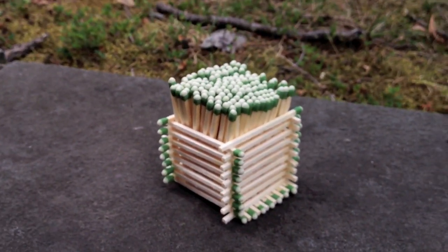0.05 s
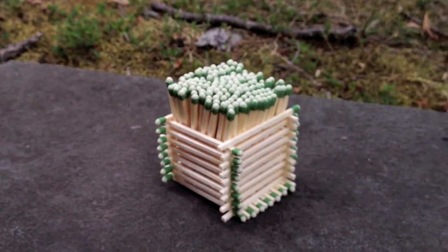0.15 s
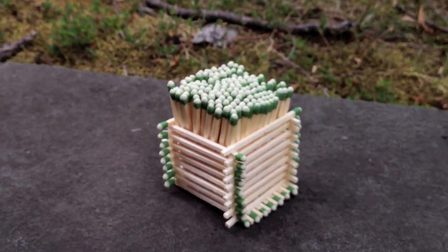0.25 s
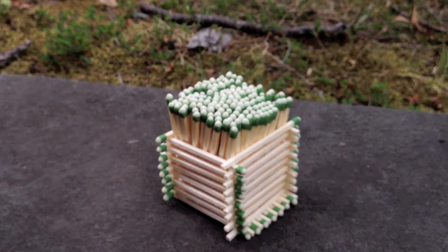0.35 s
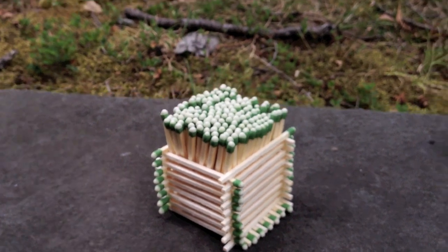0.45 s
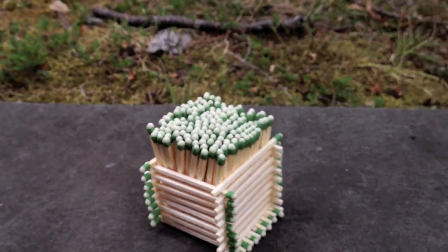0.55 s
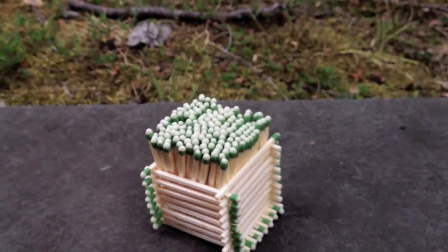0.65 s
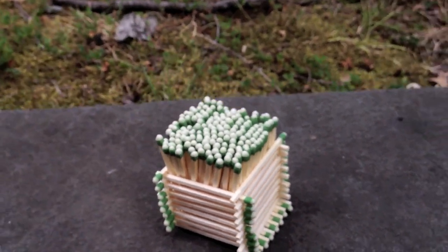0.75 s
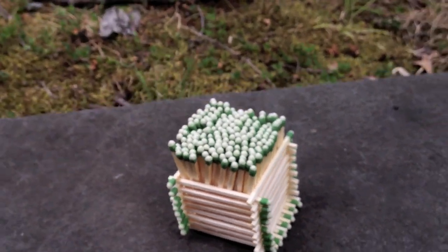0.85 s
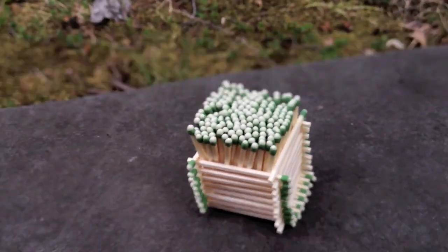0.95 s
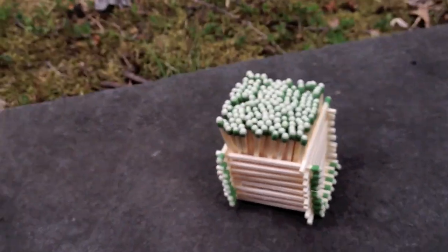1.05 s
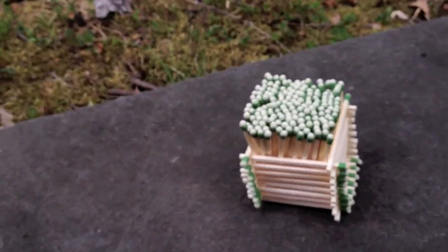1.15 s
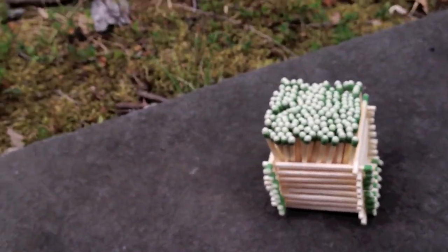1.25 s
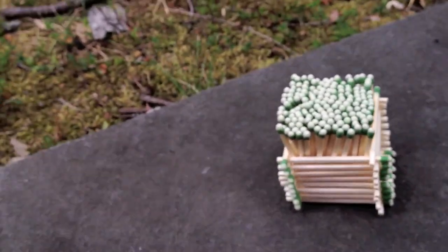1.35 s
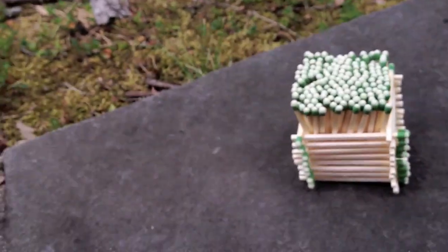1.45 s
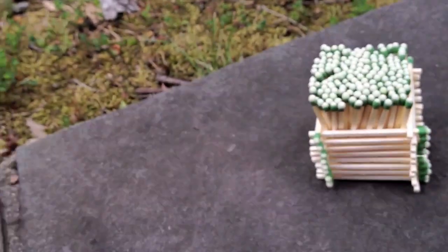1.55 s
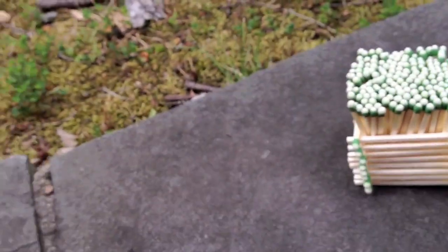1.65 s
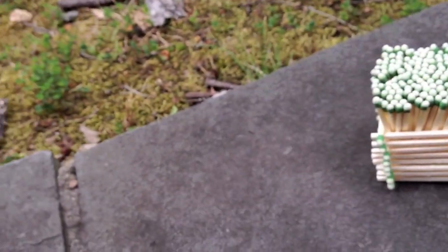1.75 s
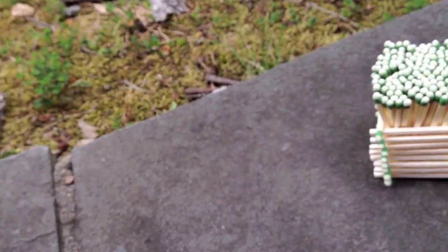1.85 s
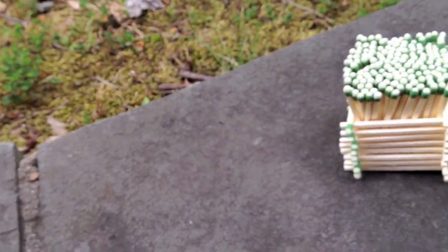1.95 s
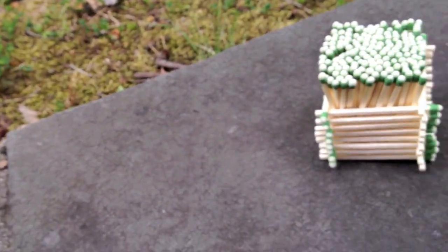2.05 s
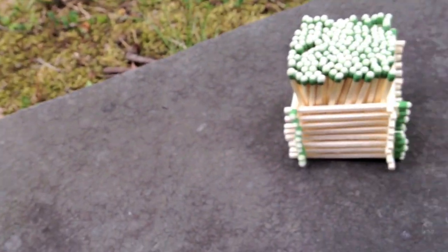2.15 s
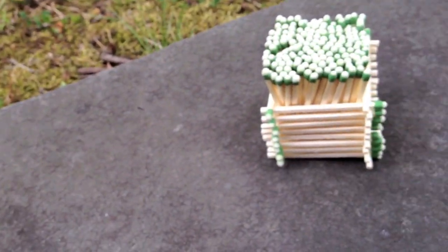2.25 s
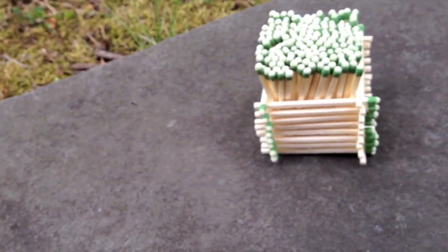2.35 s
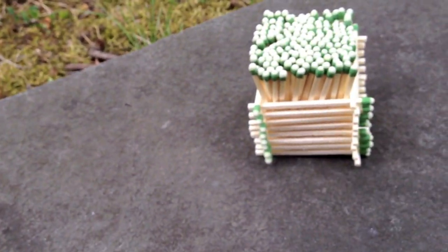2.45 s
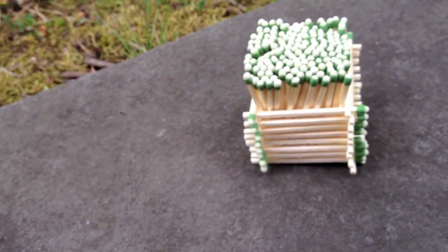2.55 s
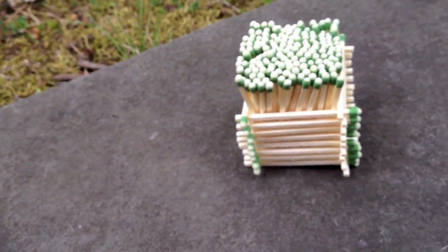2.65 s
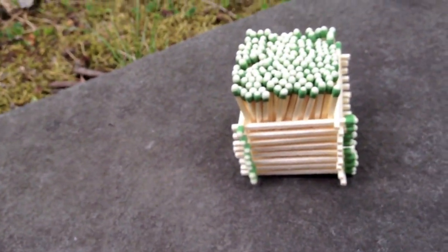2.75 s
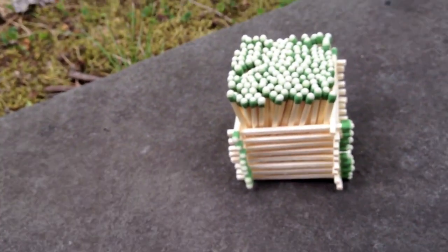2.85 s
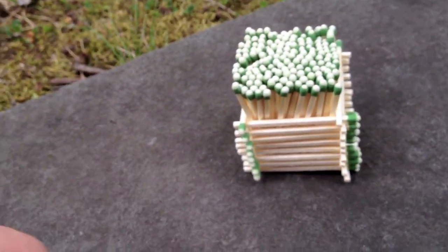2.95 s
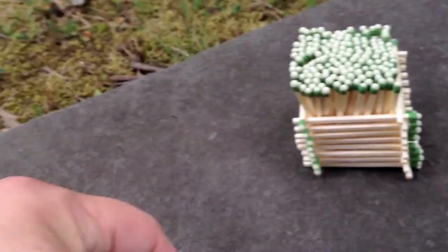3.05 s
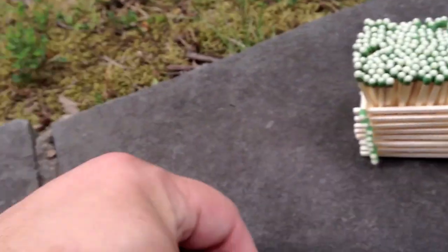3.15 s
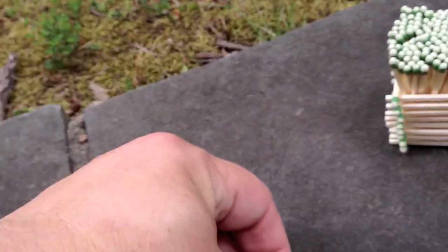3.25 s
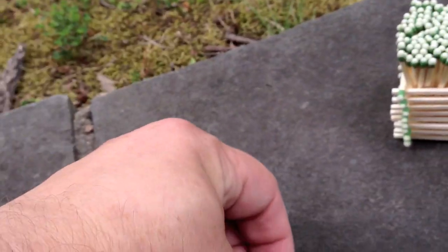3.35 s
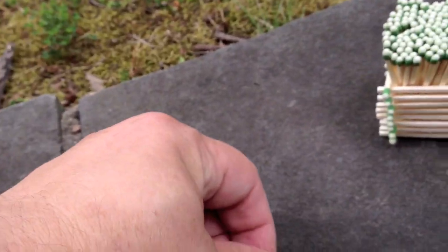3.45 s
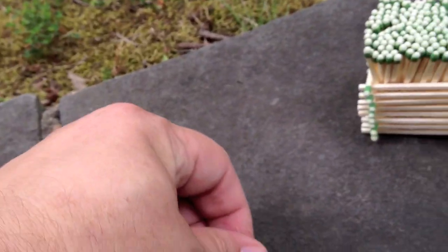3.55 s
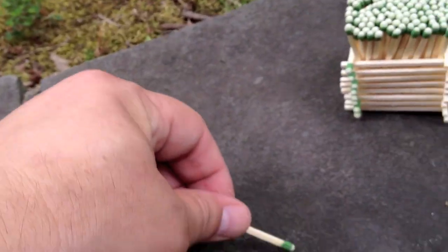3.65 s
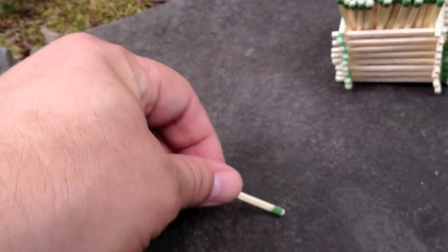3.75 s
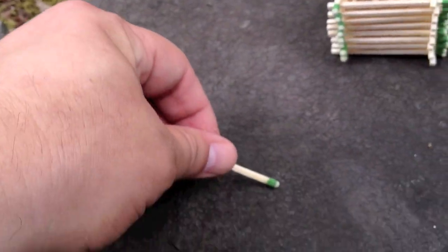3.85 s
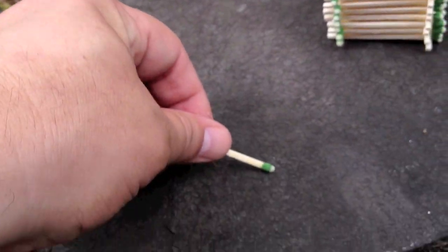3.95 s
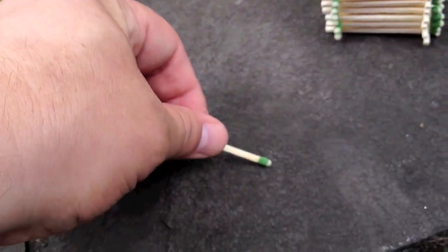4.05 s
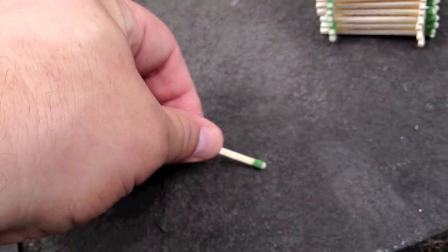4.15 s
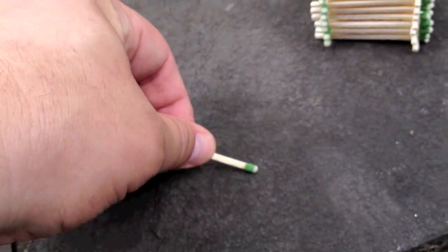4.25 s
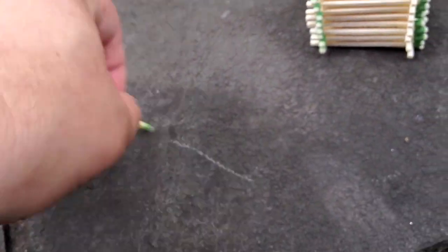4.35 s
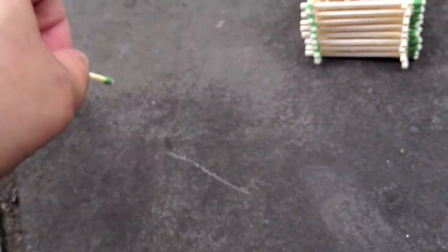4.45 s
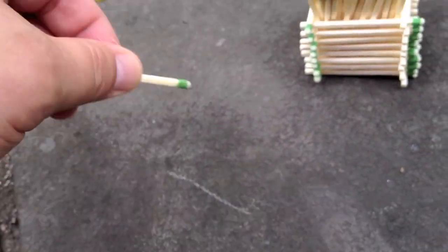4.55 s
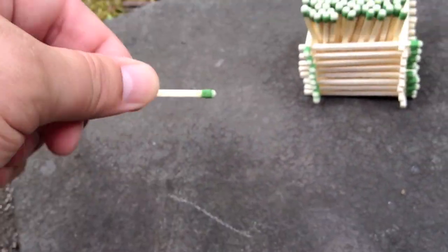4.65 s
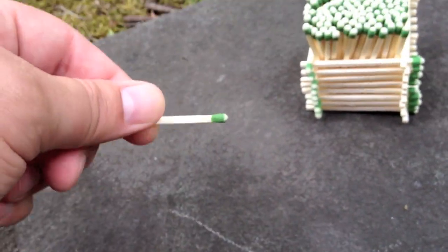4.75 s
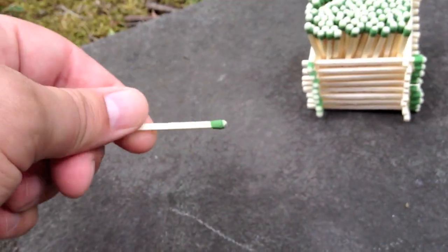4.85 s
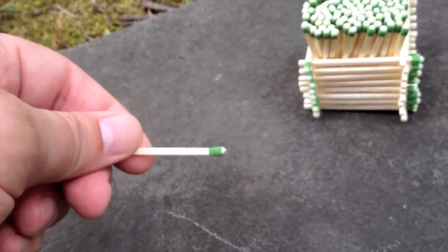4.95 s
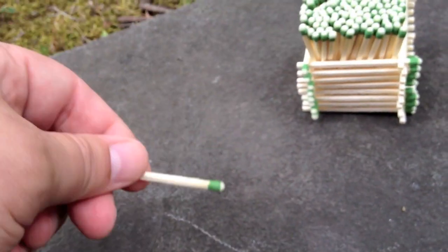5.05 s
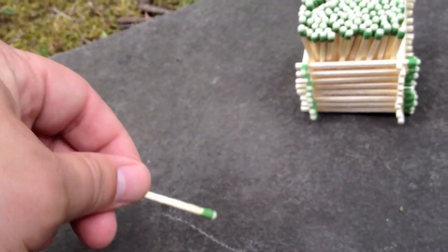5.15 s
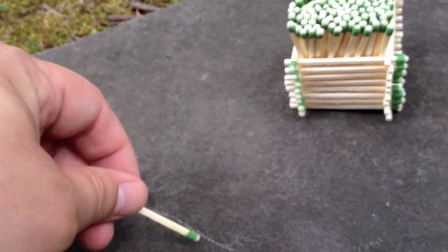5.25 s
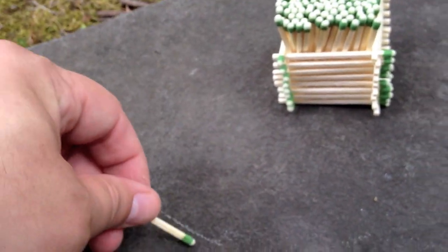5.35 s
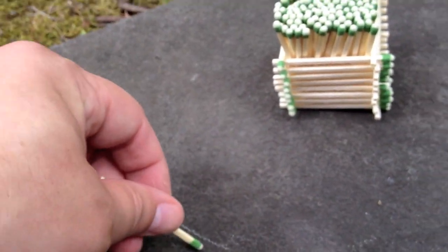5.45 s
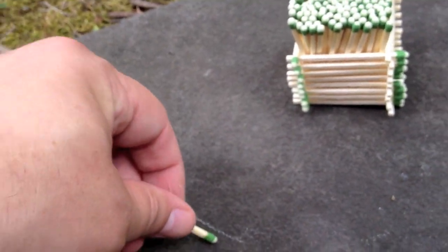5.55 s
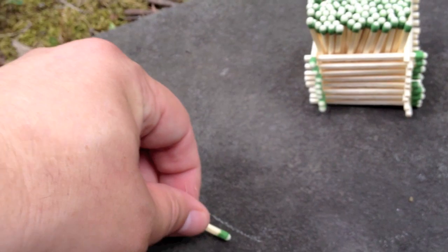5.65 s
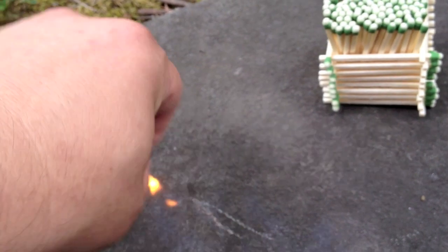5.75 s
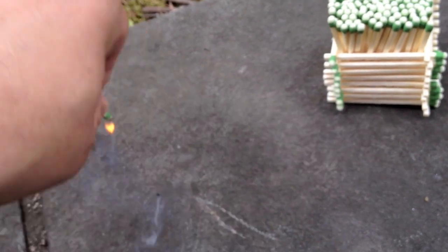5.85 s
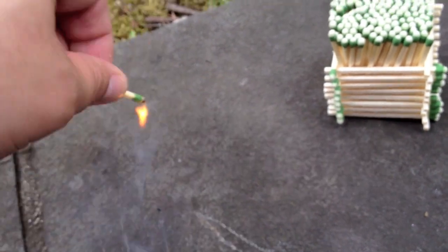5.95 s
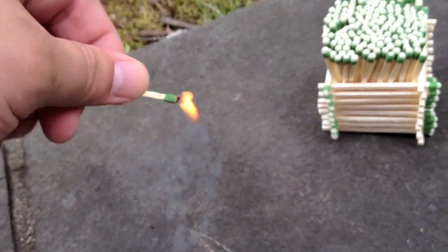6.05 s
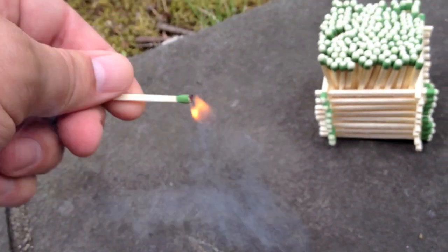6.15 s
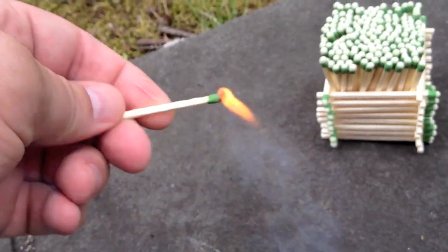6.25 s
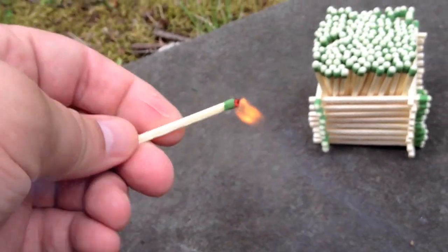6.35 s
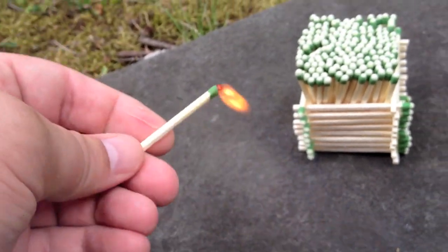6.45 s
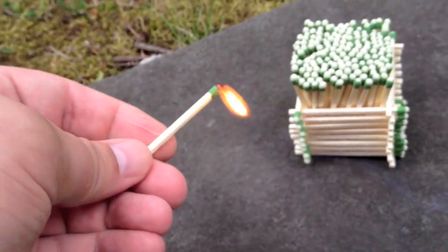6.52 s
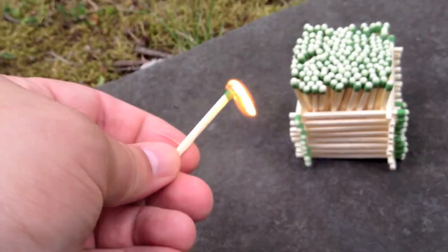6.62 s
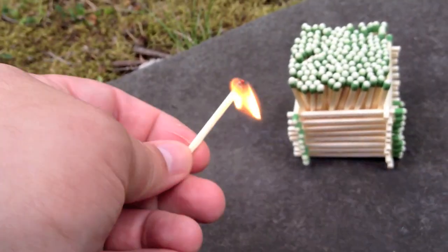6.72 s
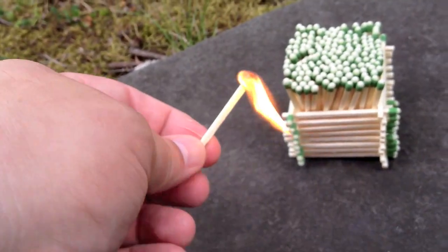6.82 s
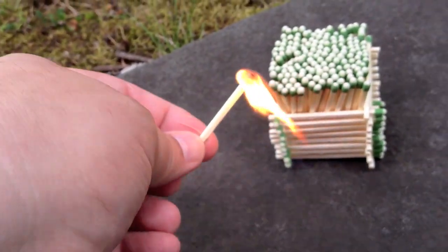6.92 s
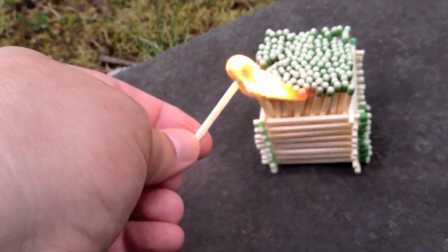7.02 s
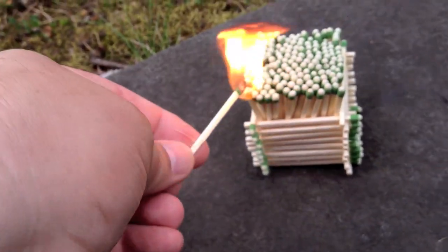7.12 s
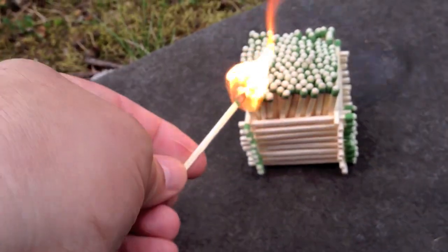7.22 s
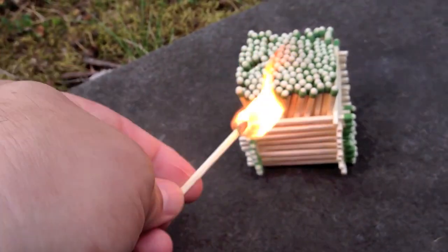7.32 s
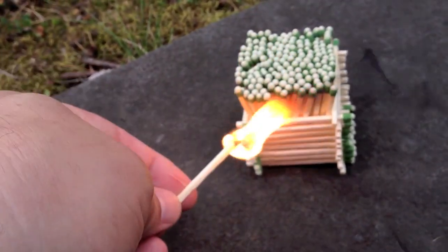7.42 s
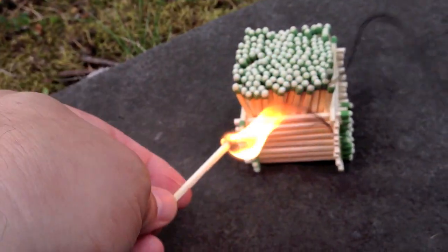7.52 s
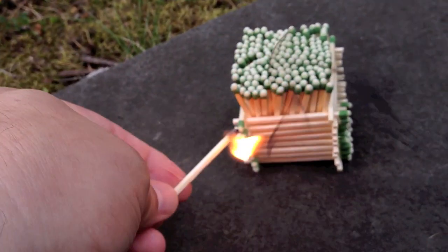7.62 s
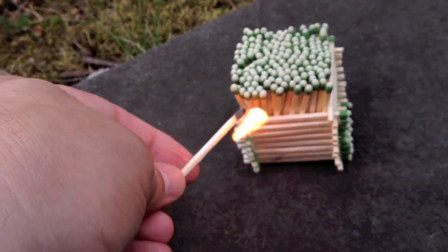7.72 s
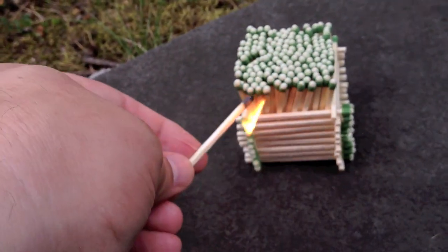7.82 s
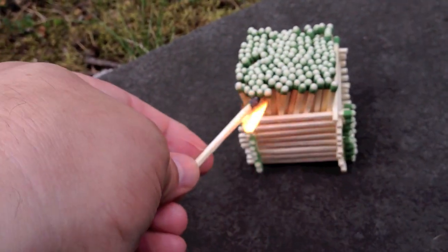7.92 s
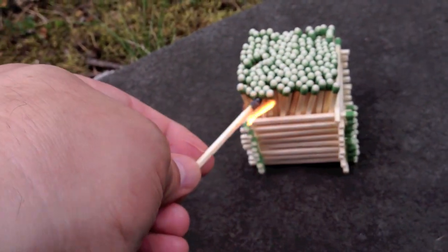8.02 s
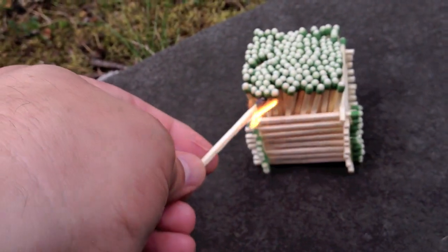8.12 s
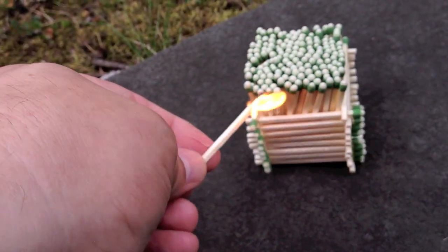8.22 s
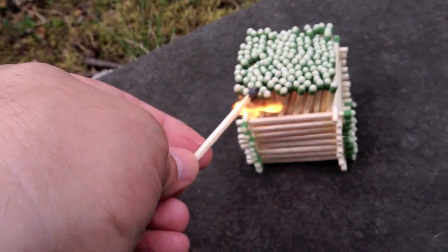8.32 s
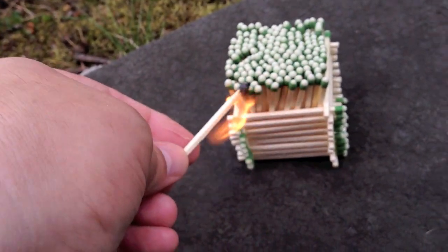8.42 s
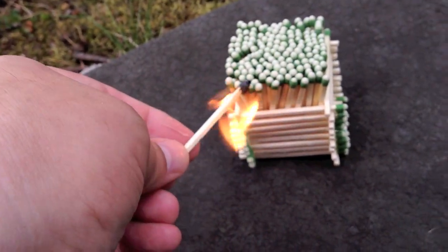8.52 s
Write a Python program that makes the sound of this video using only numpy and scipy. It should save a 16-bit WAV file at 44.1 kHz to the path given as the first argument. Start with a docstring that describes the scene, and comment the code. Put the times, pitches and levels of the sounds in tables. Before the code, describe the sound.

A match scrapes on stone, snaps alight and fizzes, over trilling insects, faint bird calls, distant traffic and a far whining power tool.

```python
"""A match scrapes on a stone slab in gritty, snapping strokes until it lights. The head fizzes and pops as gas
escapes, then sputters in quick uneven spurts; fingers tap and cloth rubs close by. Behind it insects trill, a
bird calls, traffic hums and a far power tool whines, runs down and picks up. The hand-held mono recorder ducks
after each loud stroke and recovers slowly."""
import sys
import numpy as np
from scipy import signal
from scipy.fft import rfft, irfft, next_fast_len
from scipy.io import wavfile
from scipy.ndimage import uniform_filter1d

SR = 44100
rng = np.random.default_rng(int(sys.argv[2]) if len(sys.argv) > 2 else 0)


def unload_audio(sound):
    """Save the sound as a 16-bit wav file, at the path given as the first command line argument."""
    columns = np.transpose(np.atleast_2d(sound))
    # keep every value between -1 and 1, then stretch to whole-number steps
    steps = np.round(np.clip(columns, -1, 1) * 32767)
    wavfile.write(sys.argv[1], SR, steps.astype(np.int16))


N = 378378
T = np.arange(N) / SR

# bright hiss of escaping gas and swishing cloth: (frequency [Hz], level [dB])
HISS_SPECTRUM = [(300, -26), (1500, 14.5), (4000, 11), (6500, 13), (9000, 6), (13000, 9.5), (15500, 5.5)]


def match_strokes(attack_s=0.00017, release_t60=0.0064, body_hz=2800):
    """Stone grit rakes the head: a grainy rasp, with more low body in the hard-pressed strokes."""
    # drags over the stone: (start [s], length [s], level [dB], low body gain [dB])
    drags = [(3.474, 0.059, -43, -8), (4.3, 0.048, -38.5, -18), (4.347, 0.026, -28.5, -24),
             (4.3745, 0.01, -28, 3), (5.67, 0.022, -52, -20), (5.734, 0.0035, -14, 5),
             (5.7501, 0.023, -14, 5.5), (5.768, 0.053, -37, 3.5)]
    # tone of the grit: (frequency [Hz], level [dB])
    grit_spectrum = [(30, -23), (200, -11.5), (500, -3), (1100, 1), (1500, -4), (2500, 2), (7000, 3),
                     (9500, -2), (14500, -3), (16000, -16)]
    grit = grains(rate=5000, spread_db=9.5) + 0.38 * rng.standard_normal(N)
    rasp = unit(matchstick(colour(grit, grit_spectrum), ring=1.0))
    body = filtered(rasp, lambda hz: 1 / (1 + (hz / body_hz) ** 4))
    out, t = np.zeros(N), np.arange(SR // 5) / SR
    for start, length, db, body_db in drags:
        release = amp(db - 60 * np.maximum(t - length, 0) / release_t60)
        pressure = (1 - np.exp(-t / attack_s)) * release
        span = slice(round(start * SR), round(start * SR) + len(t))
        add(out, start, pressure * (rasp[span] + (amp(body_db) - 1) * body[span]))
    return out


def match_snaps(trim_db=-1, crack_t60=0.0011, crack_db=-5, spray_t60=0.042, spray_db=-23):
    """Grit catches and the head bursts: each snap is a sharp crack with a short spray of fragments."""
    # catches and bursts: (time [s], level [dB])
    snaps = [(2.575, -26), (3.485, -19), (4.3048, -15.5), (4.3473, -6.5), (4.357, 1.5), (4.382, -1.5),
             (5.335, -31), (5.735, -1), (5.753, 10.5), (5.7646, 2), (5.7675, -1), (6.199, -14.5),
             (6.3034, -20), (6.3535, -18), (6.3799, -3), (6.420, -15), (7.393, -35), (7.402, -21.5)]
    out, t = np.zeros(N), np.arange(SR // 30) / SR
    for start, db in snaps:
        decay = amp(crack_db - 60 * t / crack_t60) + amp(spray_db - 60 * t / spray_t60)
        burst = rng.standard_normal(len(t)) * decay
        burst[0] = 1
        add(out, start, amp(db + trim_db) * burst / np.abs(burst).max())
    bright_click = impulse([(40, -36), (200, -30), (1000, -9.0), (2500, -2), (7000, 2.5), (15000, -1.5)])
    return matchstick(signal.fftconvolve(out, bright_click)[:N], ring=0.64)


def matchstick(x, ring):
    """The thin stick adds its own ringing to the contact sound x."""
    # resonances of the stick: (frequency [Hz], width [Hz], gain [dB])
    modes = [(3240, 130, -9), (4660, 150, -1), (6570, 340, -6), (8600, 270, 0.5), (11300, 680, 0),
             (13200, 870, 6)]

    def resonance(f):
        return sum(amp(db) * 1j * f * width / (hz * hz - f * f + 1j * f * width)
                   for hz, width, db in modes)
    return filtered(x, lambda f: 1 + ring * resonance(f))


def flame(rise_s=0.03, fall_s=0.029, flicker_db=1.2, spurt_db=2.35):
    """Gas fizzes out of the burning head and spits in quick uneven spurts; both surge in flare-ups."""
    # flare-ups: (start [s], length [s], fizz level [dB], spit level [dB])
    flares = [(5.916, 0.46, -49.5, -57), (7.1, 0.25, -66, -52.5), (7.355, 0.032, -53, -42),
              (8.206, .1, -59, -55.5), (8.48, 0.077, -49, -50.5)]
    steady_burn = (5.8, 1.71, -54.5, -58.5)  # same columns
    # throaty tone of the spitting: (frequency [Hz], level [dB])
    spit_spectrum = [(100, -32), (450, 6), (900, 4), (2200, -7.5), (4000, 2), (6000, -5.5), (9000, -37),
                     (15000, -23)]
    fizz_power, spit_power = np.zeros(N), np.zeros(N)
    for start, length, fizz_db, spit_db in [steady_burn, *flares]:
        burn = gate(start, length, rise_s, fall_s)
        fizz_power += (amp(fizz_db) * burn) ** 2
        spit_power += (amp(spit_db) * burn) ** 2
    fizz = colour(grains(rate=1600, spread_db=7.0) + rng.standard_normal(N), HISS_SPECTRUM)
    fizz *= amp(flicker_db * wobble(23))
    spit = colour(grains(rate=280, spread_db=3) + 0.47 * rng.standard_normal(N), spit_spectrum)
    spit *= amp(spurt_db * wobble(70))
    return np.sqrt(fizz_power) * fizz + np.sqrt(spit_power) * spit


def taps_and_pops(firm_tap_db=-14, click_growth=1.7, low_cut_hz=140):
    """Fingers tap with a thud, brighter when firmer; the stick knocks once and the flame pops hollowly."""
    # soft finger taps: (time [s], level [dB])
    taps = [(0.839, -24), (.926, -22), (0.972, -16), (1.001, -23.5)]
    # one dry knock of the stick, then hollow pops of the flame: (time [s], level [dB], pitch [Hz])
    knock_and_pops = [(4.364, -14, 1260), (6.355, -22, 1094), (7.347, -28.5, 776), (7.392, -28.5, 1100),
                      (7.446, -29, 1190), (7.924, -27.5, 710)]
    out = np.zeros(N)
    for start, db in taps:
        click_db = click_growth * (db - firm_tap_db)
        add(out, start, amp(db) * hollow_hit(ring_hz=830, click_db=click_db, thud_db=-3))
    for start, db, hz in knock_and_pops:
        add(out, start, amp(db) * hollow_hit(ring_hz=hz, click_db=-6, thud_db=-11))
    return signal.sosfilt(signal.butter(2, low_cut_hz, 'high', fs=SR, output='sos'), out)


def hollow_hit(ring_hz, click_db, thud_db, scatter=0.49, scatter_t60=0.0051, ring_t60=0.0032,
               thud_hz=210, thud_t60=0.0085):
    """One tap, knock or pop: a brief hollow ring with a small click and a short low thud."""
    # tone of the click: (frequency [Hz], level [dB])
    click_spectrum = [(100, 1), (700, -18), (2000, 2.5), (5000, 8.5), (7000, 3), (10000, -5), (15000, -30)]
    t = np.arange(SR // 15) / SR
    burst = scatter * rng.standard_normal(len(t)) * amp(-60 * t / scatter_t60)
    burst[0] = 1
    click = signal.fftconvolve(burst, impulse(click_spectrum))[:len(t)]
    ring = np.sin(2 * np.pi * ring_hz * t) * amp(-60 * t / ring_t60)
    thud = np.sin(2 * np.pi * thud_hz * t) * amp(thud_db - 60 * t / thud_t60)
    return amp(click_db) * click / np.abs(click).max() + ring + thud


def clothes():
    """Cloth rubs in small slips, with a fine swish on top."""
    # dull rubs: (centre [s], length [s], level [dB])
    rubs = [(0, 0.27, -55), (.58, 0.34, -49.5), (.93, 0.19, -54.5), (1.33, 0.21, -50), (1.88, 0.28, -53),
            (2.53, 0.15, -54), (4.08, .45, -56)]
    # light swishes: (centre [s], length [s], level [dB])
    swishes = [(1.15, 1.2, -50.5), (2.03, .12, -57), (2.76, .2, -56), (4.13, 0.41, -57.5)]
    # muffled tone of the rubbing: (frequency [Hz], level [dB])
    rub_spectrum = [(100, -19), (400, 5), (800, 3), (1200, -4), (2000, -11.5), (6000, -33)]
    slips = colour(grains(rate=700, spread_db=5) + 1.2 * rng.standard_normal(N), rub_spectrum)
    return swells(rubs) * slips + swells(swishes) * noise(HISS_SPECTRUM)


def insects(chorus_db=-49.5, flutter_db=1.0, drift=0.003):
    """Many wing files merge into one high, fluttering trill; a few near crickets hold their own pitch."""
    # narrow band of the chorus: (frequency [Hz], level [dB])
    trill_spectrum = [(6400, -33), (6900, -8), (7100, -10), (7270, 0.5), (7550, 6), (7850, 7), (8130, 1.5),
                      (8260, -4), (8400, -4), (8600, -22), (9200, -53)]
    # nearest singers: (pitch [Hz], level [dB])
    crickets = [(7080, -62), (7620, -62.5), (7830, -57.5), (8090, -57)]
    out = amp(chorus_db + flutter_db * wobble(90) + 0.4 * wobble(9)) * noise(trill_spectrum)
    for hz, db in crickets:
        gain = amp(db + 0.23 * wobble(2.8))
        out += gain * whistle(hz * (1 + drift * wobble(7)), blur_rate=90, clean=0.77)
    return out


def bird(arch=0.155, echo_db=-7, echo_t60=0.79):
    """A far bird gives short arched whistles that scatter among the trees."""
    # calls: (centre [s], length [s], top pitch [Hz], level [dB])
    calls = [(0.31, 0.09, 1500, -49), (1.797, 0.03, 2940, -44), (1.859, 0.034, 3150, -48),
             (5.602, 0.16, 1630, -50), (6.223, 0.11, 1610, -51.5), (6.824, 0.074, 1537, -48),
             (7.598, 0.057, 1527, -48), (8.19, 0.093, 1543, -46)]
    out = np.zeros(N)
    for centre, length, hz, db in calls:
        position = np.linspace(-1, 1, int(length * SR))
        phase = 2 * np.pi * np.cumsum(hz * (1 - arch * position ** 2)) / SR
        add(out, centre - length / 2, amp(db) * np.cos(np.pi * position / 2) * np.sin(phase))
    out *= 1 + 0.33 * wobble(150)
    t = np.arange(SR // 2) / SR
    trees = rng.standard_normal(len(t)) * amp(-60 * t / echo_t60)
    return out + amp(echo_db) * signal.fftconvolve(out, trees / np.linalg.norm(trees))[:N]


def power_tool(free_hz=4690, blades=9, slow_s=0.42, strain_hz=164, idle_hz=3200, idle_lag_s=0.16):
    """A far motor's whine swells under strain and rasps as it slows; air, hum and howl follow speed."""
    # loads that bog the motor down: (start [s], length [s], pitch drop if the load lasted [Hz])
    loads = [(-.25, 0.51, 569.3), (1.06, .22, 562), (1.802, .3, 525.5), (3.798, 0.41, 860)]
    load_sag = sum(drop_hz * gate(start, length, slow_s, fall_s=0.43) for start, length, drop_hz in loads)
    throttle_eased = gate(start=6.17, length=1.65, rise_s=slow_s, fall_s=0.25)
    sag_hz = load_sag + 2270 * throttle_eased
    hz = uniform_filter1d(free_hz - sag_hz, SR // 8) * (1 + 0.00399 * wobble(18))
    speed = hz / free_hz
    strain_db = 10 * (1 - np.exp(-sag_hz / strain_hz))
    lagged_hz = np.interp(T - idle_lag_s, T, hz)
    idle_db = 42 * np.minimum(np.log2(lagged_hz / idle_hz), 0)  # near idle the whine fades, a little late
    whine_db = -62.5 + 6.0 * np.log2(speed) + strain_db + idle_db
    rasp_share = np.clip(0.1 + 2.8 * (1 - speed), 0, 1)
    smooth = np.sqrt(1 - rasp_share) * whistle(hz, blur_rate=110, clean=0.97)
    raspy = np.sqrt(rasp_share) * whistle(hz, blur_rate=680, clean=0)
    shaft_hz = hz / blades
    hum = amp(-64) * whistle(shaft_hz, blur_rate=40, clean=0.51)
    howl = amp(-61) * whistle(4 * shaft_hz, blur_rate=260, clean=0)
    effort = amp(11 * np.log2(speed) + 0.27 * wobble(6.0))
    # air rushing through the fan: (frequency [Hz], level [dB])
    air_spectrum = [(300, -50), (700, -2), (1250, -3), (2100, 1.5), (3300, -2), (4600, -4), (5400, -13),
                    (7000, -5), (9000, -13.5), (14000, -40.5)]
    air = amp(-51) * noise(air_spectrum)
    return amp(whine_db) * (smooth + raspy) + effort * (air + hum + howl)


def traffic(rush_db=-47.0, drone_hz=234, drone_db=-58):
    """Distant roads: a low rush with a wavering drone."""
    # bed of road noise: (frequency [Hz], level [dB])
    road_spectrum = [(25, -40), (60, -21), (85, -17.5), (115, -3), (180, 0), (240, 0.5), (310, -8),
                     (400, -14), (700, -16.5), (1300, -27), (3000, -25), (6000, -29.5), (10000, -39),
                     (15000, -35)]
    waver = 1 + 1.9 * wobble(10)
    hz = drone_hz * (1 + 0.032 * wobble(10))
    drone = unit(waver * np.sin(2 * np.pi * np.cumsum(hz) / SR))
    return amp(rush_db + 0.12 * wobble(8.3)) * noise(road_spectrum) + amp(drone_db) * drone


def amp(db):
    """Decibels to gain."""
    return 10 ** (np.asarray(db) / 20)


def unit(x):
    """Scale to rms 1."""
    return x / np.sqrt(np.mean(x ** 2) + 1e-20)


def wobble(rate, oversample=8):
    """A smooth random curve, rate knots a second."""
    knots = signal.resample_poly(rng.standard_normal(int(N * rate / SR) + 4), oversample, 1)
    return np.interp(T * rate * oversample, np.arange(len(knots)), knots)


def filtered(x, response):
    """x through a complex frequency response."""
    size = next_fast_len(len(x) + SR // 4)
    return irfft(rfft(x, size) * response(np.fft.rfftfreq(size, 1 / SR)), size)[:len(x)]


def gain_at(spectrum, hz):
    """Gain at hz from (frequency [Hz], level [dB]) points on a log axis."""
    f, db = np.transpose(spectrum)
    return amp(np.interp(np.log(hz + 1), np.log(f), db))


def colour(x, spectrum):
    """x shaped by the spectrum, at rms 1."""
    return unit(filtered(x, lambda hz: gain_at(spectrum, hz)))


def noise(spectrum):
    """Coloured noise of rms 1."""
    return colour(rng.standard_normal(N), spectrum)


def grains(rate, spread_db):
    """Random tiny impulses of uneven size, about rate a second, rms 1."""
    hits = (rng.random(N) < rate / SR) * rng.choice([-1, 1], N)
    return unit(hits * amp(spread_db * np.clip(rng.standard_normal(N), -2, 2)))


def impulse(spectrum, size=1024):
    """The minimum-phase click that has this spectrum, peak 1."""
    cepstrum = irfft(np.log(gain_at(spectrum, np.fft.rfftfreq(size, 1 / SR))))
    cepstrum[1:size // 2] *= 2
    cepstrum[size // 2:] = 0
    click = irfft(np.exp(rfft(cepstrum)))
    return click / np.abs(click).max()


def whistle(hz, blur_rate, clean):
    """A tone of rms 1, fluttering blur_rate times a second; clean weights its steady part."""
    flutter = clean + wobble(blur_rate) + 1j * wobble(blur_rate)
    return unit(np.real(flutter * np.exp(2j * np.pi * np.cumsum(hz) / SR)))


def swells(rows):
    """Bell-shaped gains from (centre [s], width at half power [s], level [dB]) rows."""
    return np.sqrt(sum(amp(db) ** 2 * .5 ** ((2 * (T - centre) / width) ** 2)
                       for centre, width, db in rows))


def gate(start, length, rise_s, fall_s):
    """Climbs towards 1 from start for length seconds, then dies away."""
    attack = 1 - np.exp(-np.clip(T - start, 0, length) / rise_s)
    return attack * np.exp(-np.maximum(T - start - length, 0) / fall_s)


def add(track, start, sound):
    """Mix a sound in at start seconds."""
    part = track[round(start * SR):][:len(sound)]
    part += sound[:len(part)]


def scene():
    """The close match and the far background reach one microphone."""
    near = match_strokes() + match_snaps() + taps_and_pops() + flame() + clothes()
    far = insects() + bird() + power_tool() + traffic()
    return np.tile(near + far, (2, 1))


def gain_control(x, threshold_db=-30, slope=0.42, recovery_db_per_s=4.0, window_s=0.041):
    """Loud sound pulls the gain down; it then creeps back."""
    pole = np.exp(-1 / (window_s * SR))
    level_db = 10 * np.log10(signal.lfilter([1 - pole], [1, -pole], x[0] ** 2) + 1e-12)
    duck_db = slope * np.maximum(level_db - threshold_db, 0)
    held_db = np.maximum.accumulate(duck_db + recovery_db_per_s * T) - recovery_db_per_s * T
    return x * amp(-signal.lfilter([1 - pole], [1, -pole], held_db))


def record(dry, low_cut_hz=30, high_cut_hz=15400):
    """Gain control, clipping at full scale, a low cut and a steep high cut."""
    low_cut = signal.butter(2, low_cut_hz, 'high', fs=SR, output='sos')
    high_cut = signal.ellip(8, .5, 70, high_cut_hz, fs=SR, output='sos')
    clipped = np.clip(gain_control(dry), -1, 1)
    return signal.sosfilt(high_cut, signal.sosfilt(low_cut, clipped))


dry = scene()
out = record(dry)
unload_audio(out)
```